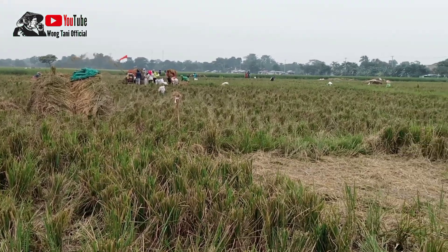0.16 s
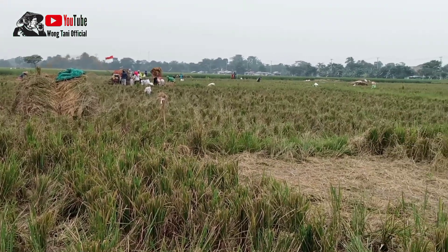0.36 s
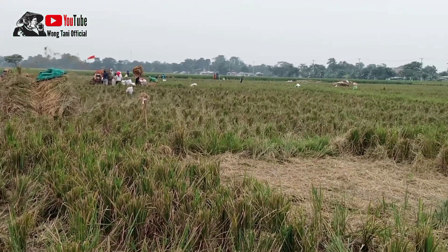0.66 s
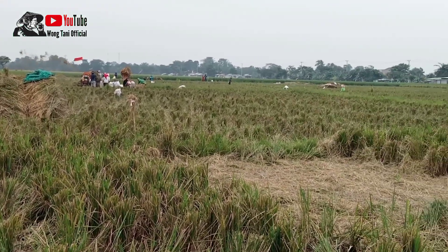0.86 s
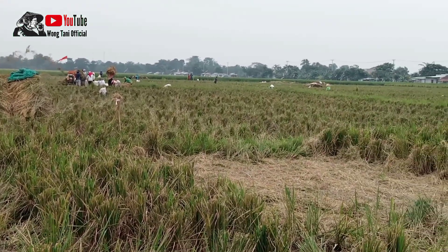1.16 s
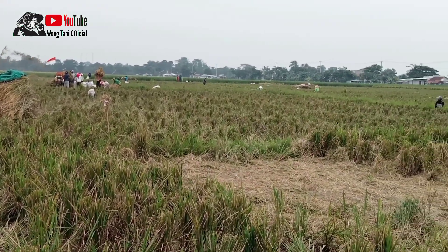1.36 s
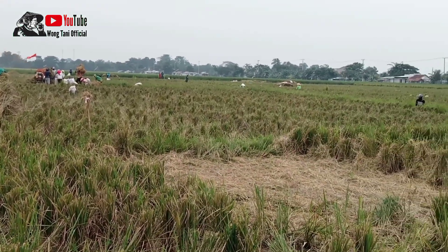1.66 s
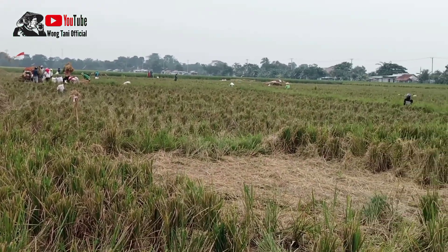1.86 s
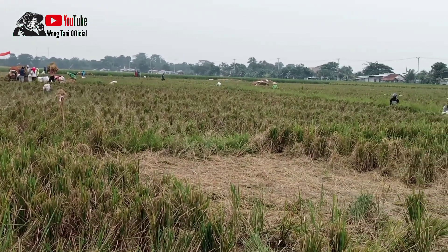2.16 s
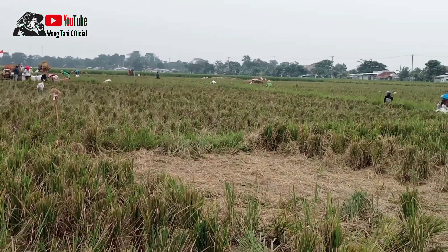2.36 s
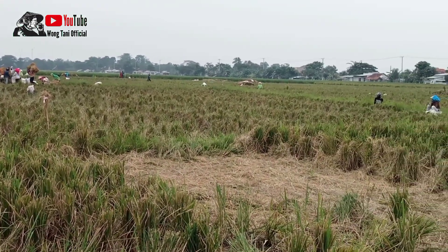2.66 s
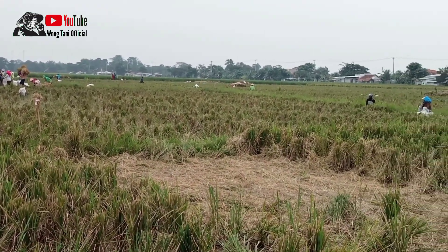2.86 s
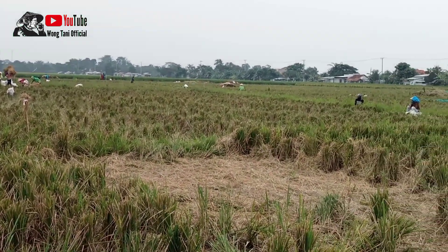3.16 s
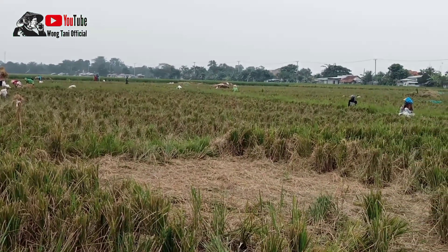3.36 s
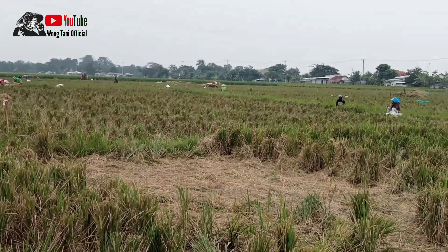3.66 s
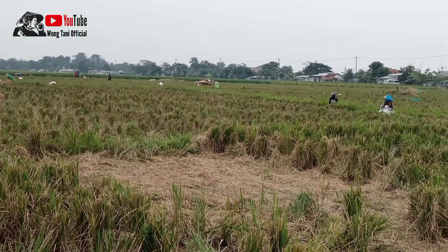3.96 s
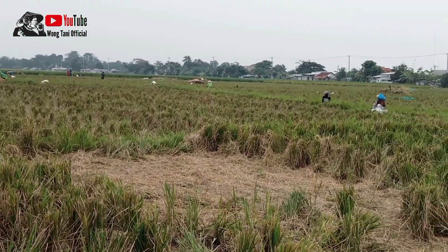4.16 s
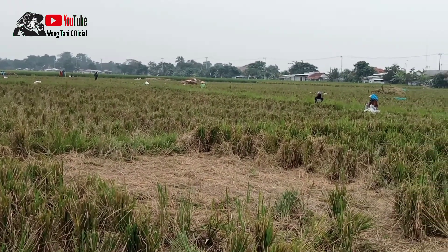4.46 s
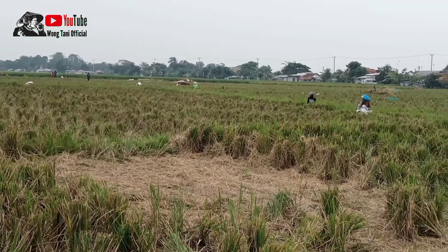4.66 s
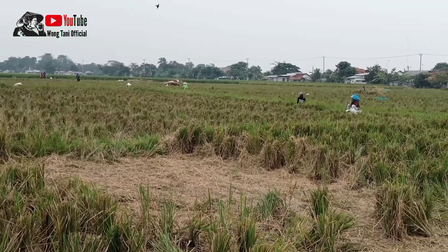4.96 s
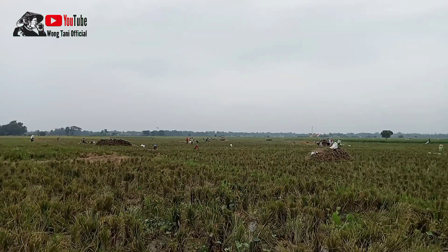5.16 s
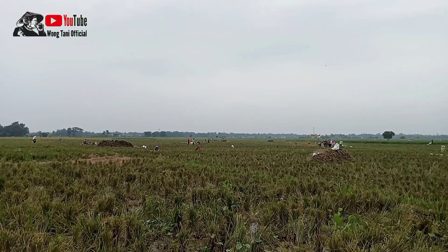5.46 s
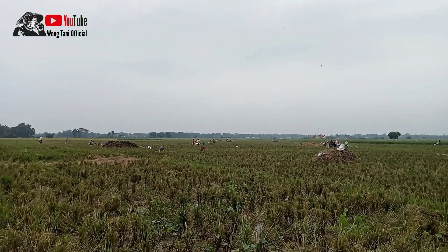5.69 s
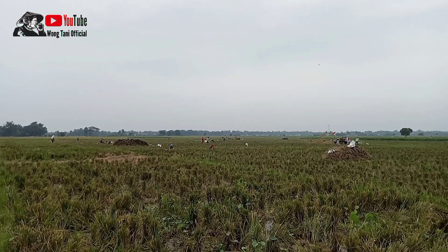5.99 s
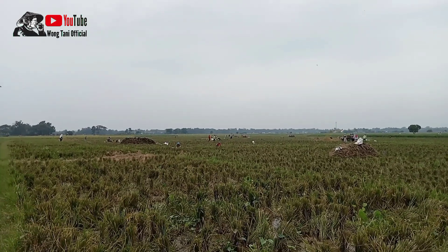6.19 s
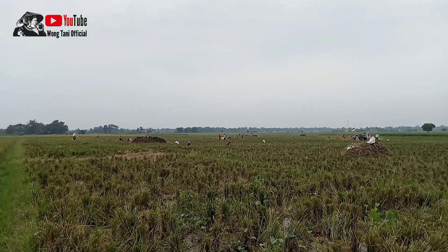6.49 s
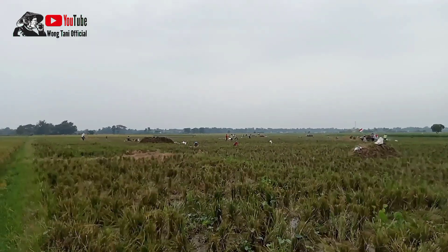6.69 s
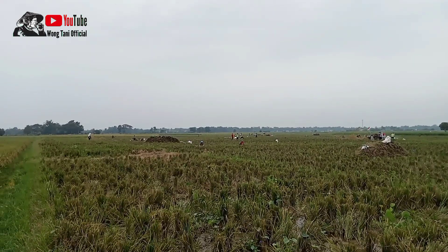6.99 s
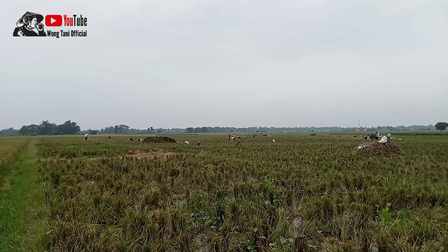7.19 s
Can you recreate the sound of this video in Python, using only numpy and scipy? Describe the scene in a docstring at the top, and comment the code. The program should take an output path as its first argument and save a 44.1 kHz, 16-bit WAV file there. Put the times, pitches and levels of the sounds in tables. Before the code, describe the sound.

A small engine chugs with a hissing bark, slows and barks harder, then after a brief break gives way to a distant drone.

```python
"""A one-cylinder engine drives a rice thresher in an open field: each firing is a thump and a hissing bark.
Other engines drone far away, over soft air and insects. The listener turns, which changes the bark's
tone, and there is a dry knock. Near 3 s the thresher is fed: the engine slows and barks harder.
At 5 s, after a brief silence, the field fades in from a spot farther off. There the bark is faint,
the drone remains, and a small knock and a rustle come near the end."""
import sys
import numpy as np
from scipy import signal
from scipy.fft import rfft, irfft, next_fast_len
from scipy.io import wavfile
from scipy.ndimage import uniform_filter1d, map_coordinates

SR = 44100
rng = np.random.default_rng(int(sys.argv[2]) if len(sys.argv) > 2 else 0)


def transcribe(signal):
    """Save signal, clipped to [-1, 1], as a 16-bit WAV file at the path in sys.argv[1]."""
    frames = np.atleast_2d(signal).T
    limited = np.clip(frames, -1, 1)
    pcm = np.round(limited * 32767).astype(np.int16)
    wavfile.write(sys.argv[1], SR, pcm)


N = 323253
TIME = np.arange(N) / SR
SIZE = next_fast_len(N + SR // 2, real=True)  # extra room for filters to ring out
HZ = np.fft.rfftfreq(SIZE, 1 / SR)
AT_FAR_SPOT = TIME > 5.03

# tone of the low thump of a firing: f/Hz, relative level/dB
THUMP_COLOUR = [(25, -45), (50, -16), (90, -5), (140, 2), (185, -3.5), (235, -7.5), (300, -7), (340, -12.5),
                (385, -25.5), (520, -29), (800, -59), (2000, -88)]


def amp(db):
    """Turn decibels into a gain to multiply by."""
    return 10 ** (np.asarray(db) / 20)


def unit(x):
    """Scale a signal to an average (RMS) strength of 1."""
    return x / np.sqrt(np.mean(x ** 2) + 1e-20)


def curve(points):
    """Join (time, value) points with straight lines, one value per sample."""
    return np.interp(TIME, *np.transpose(points))


def wobble(rate):
    """A smooth curve through `rate` random values a second."""
    knots = rng.standard_normal(int(N * rate / SR) + 4)
    fine = np.linspace(0, len(knots) - 1, 10 * len(knots))
    return np.interp(TIME * rate, fine, map_coordinates(knots, [fine]))


def colour(points):
    """A gain for each frequency, drawn through (f/Hz, level/dB) points."""
    hz, db = np.transpose(points)
    return amp(np.interp(np.log(HZ + 1), np.log(hz), db))


def resonances(modes):
    """A gain for each frequency, with a steep peak at each (f/Hz, width/Hz, level/dB)."""
    return np.sqrt(sum(amp(2 * db) / (1 + ((HZ - hz) / width) ** 2) ** 2 for hz, width, db in modes))


def filtered(x, gain):
    """Shape the tone of x so that it rings only after each hit (a minimum-phase filter)."""
    cepstrum = irfft(np.log(np.maximum(gain, 1e-6)), SIZE)
    cepstrum[1:SIZE // 2] *= 2
    cepstrum[SIZE // 2 + 1:] = 0
    return irfft(rfft(x, SIZE) * np.exp(rfft(cepstrum)), SIZE)[:N]


def noise(gain):
    """Steady noise of strength 1, its tone shaped by `gain`."""
    return unit(filtered(rng.standard_normal(N), gain))


def field():
    """Soft air over the rice, with a thin, high band of insects."""
    # tone of the air: f/Hz, relative level/dB
    air_colour = [(20, 0), (60, -5), (300, 3.5), (450, -3), (620, -8), (1000, -1), (1350, -10.5),
                  (1600, -2), (2100, 1.5), (3000, -8.5), (5400, -17.5), (7200, -21), (9000, -13.5),
                  (12000, -32), (15500, -46)]
    air = noise(colour(air_colour)) * amp(np.where(AT_FAR_SPOT, -60, -58) + wobble(2.51))
    insects = noise(resonances([(7170, 220, 0)])) * amp(-68.5 + 1.5 * wobble(6.2))
    return air + insects


def knocks():
    """Dry knocks and a soft rustle, each a band of noise that swells and dies."""
    # small sounds: t/s, level/dB, f/Hz, width/Hz, rise/s, time to fall 60 dB/s
    events = [(1.2355, -33, 2100, 210, 0.00035, 0.02), (1.222, -19, 3160, 390, 0.0015, 0.012),
              (6.598, -45.5, 1670, 370, 0.0045, 0.13), (6.598, -50, 2900, 740, 0.004, 0.14),
              (6.83, -52, 1630, 460, 0.098, 0.75)]
    out = np.zeros(N)
    for start, db, hz, width, rise, t60 in events:
        age = np.clip(TIME - start, 0, 2 * t60)
        envelope = (1 - np.exp(-age / rise)) * amp(db - 60 * age / t60)
        out += envelope * noise(resonances([(hz, width, 0)]))
    return out


def firings(rate, first_s, jitter_s, scatter_db):
    """One click each time an engine fires, slightly uneven in time and strength."""
    cycles = np.cumsum(rate) / SR
    cycles -= np.interp(first_s, TIME, cycles)
    on_beat = np.flatnonzero(np.diff(np.floor(cycles)))
    lateness, strength = rng.standard_normal((len(on_beat), 2)).T
    starts = np.clip(on_beat + jitter_s * SR * lateness, 0, N - 1).astype(int)
    return np.bincount(starts, amp(scatter_db * strength), N)


def distant_engines():
    """Only the low tones of other engines carry over the field; moving air makes them swell and fade."""
    # one engine a row: firing rate/Hz, relative level at the near spot/dB, at the far spot/dB
    engines = [(31.26, -5, -0.5), (27.22, -3.5, -8), (24.44, -0.5, -20.5), (33.6, -10, -7)]
    # tone of their drone: f/Hz, relative level/dB
    drone_colour = [(20, -47), (45, -20.5), (62, -14), (100, -9), (125, 1), (155, 2), (185, -0.5),
                    (210, -10), (250, -12), (300, -12.5), (345, -14), (400, -28), (600, -42), (1200, -53.5)]
    drone = np.zeros(N)
    for rate, near_db, far_db in engines:
        speed = rate * (1 + 0.00598 * wobble(2))
        pulses = firings(speed, first_s=rng.random(), jitter_s=0.0002, scatter_db=3.0)
        paths = rfft(rng.standard_normal(SR // 30), SIZE)  # many paths smear each firing
        tone = irfft(rfft(pulses, SIZE) * paths / np.abs(paths) * colour(drone_colour), SIZE)[:N]
        drone += amp(np.where(AT_FAR_SPOT, far_db, near_db) + 2 * wobble(6.5)) * unit(tone)
    rumble = noise(colour(drone_colour))
    level_db = np.where(AT_FAR_SPOT, -43, -46.5) + 1.34 * wobble(2.85)
    return amp(level_db) * unit(unit(drone) + amp(-7) * rumble)


def drifting(x, depth_db, flicker_db=1.82):
    """Moving air slowly shifts the tone of a sound, and each burst differs a little from the last."""
    spectra = signal.stft(x, nperseg=512)[2]

    def ripple(bands, frames):
        """Random values smoothed across frequency, then time."""
        rough = uniform_filter1d(rng.standard_normal(spectra.shape), size=bands, axis=0)
        return unit(uniform_filter1d(rough, size=frames, axis=1))

    change_db = depth_db * ripple(bands=3, frames=50) + flicker_db * ripple(bands=24, frames=12)
    return signal.istft(spectra * amp(change_db), nperseg=512)[1][:N]


def puffs(pulses, rise_s, fall_s, tail_db, tail_s, rough_db):
    """Each firing lets out a ragged burst of swirling gas; the field scatters a weak tail behind it."""
    t = TIME[:SR // 8]
    attack = 1 - np.exp(-(t / rise_s) ** 3)
    decay = amp(-60 * t / fall_s) + amp(tail_db - 60 * t / tail_s)
    flow = signal.fftconvolve(pulses, attack * decay)[:N]
    flow = np.roll(flow, -SR // 650)  # gas leaks just before the thump
    eddies = amp(rough_db * np.tanh(2 * wobble(1100)))
    return flow * eddies * rng.standard_normal(N)


def balanced(x, bark_db, rasp_db, hiss_db):
    """Split an exhaust sound into low rasp, middle bark and high hiss, each at its own level."""
    low = 1 / (1 + (HZ / 2500) ** 16)
    high = 1 - 1 / (1 + (HZ / 7800) ** 24)
    rasp, bark, hiss = irfft(rfft(x, SIZE) * [low, 1 - low - high, high], SIZE)[:, :N]
    return amp(bark_db) * unit(bark) + amp(rasp_db) * unit(rasp) + amp(hiss_db) * unit(hiss)


def far_engine():
    """From far off the bark is dull and smeared and the thump weak; it rings when the bark swells."""
    # engine speed: t/s, firing rate/Hz
    speed = [(5.06, 27.83), (5.4, 30.58), (5.8, 30.06), (6.2, 31.26), (6.6, 30.47), (7, 30.89),
             (7.33, 30.62)]
    # strength of the bark: t/s, level/dB
    bark_level = [(5.08, -64), (5.2, -49.5), (5.3, -51), (5.5, -60.5), (5.75, -62), (5.93, -53.5),
                  (6.3, -62.5), (6.95, -61), (7.33, -67)]
    # tone of the exhaust from afar: f/Hz, relative level/dB
    far_colour = [(350, -24), (600, -11), (950, -7), (1300, -14), (1550, 1), (2100, 8), (3030, -5),
                  (3770, -3), (4300, -6.5), (5440, -10.5), (7240, -5.5), (9000, -7), (12500, -31),
                  (15500, -20)]
    # muffler tones that carry this far: f/Hz, width/Hz, relative level/dB
    muffler = [(1590, 70, 0), (2120, 92, 8), (2350, 67, -0.5)]
    bark_db = curve(bark_level)
    swell_db = bark_db + 61.2  # how far the bark is above its usual level
    pulses = firings(curve(speed), first_s=5.074, jitter_s=0.00025, scatter_db=1.1)
    early = np.roll(pulses, -SR // 450)
    gas = puffs(early, rise_s=0.0064, fall_s=0.026, tail_db=-30, tail_s=0.084, rough_db=3.5)
    dull = filtered(gas, colour(far_colour) + resonances(muffler))
    dull = unit(drifting(dull, depth_db=2.9, flicker_db=1.3))
    bark = balanced(dull, bark_db, rasp_db=-60.7 + 0.42 * swell_db, hiss_db=-69.7 + 0.96 * swell_db)
    ring = amp(-74 + 2.15 * swell_db) * unit(filtered(gas, resonances([(3780, 180, 0)])))
    thump = amp(-52) * unit(filtered(pulses, colour(THUMP_COLOUR)))
    return bark + ring + thump


def near_bark(pulses, load):
    """Bursts of gas ring the muffler; the load and the listener's turn shift the tones that are heard."""
    # muffler tones running light, light after the turn, and under load: f/Hz, width/Hz, relative level/dB
    light_tones = [(890, 250, -25), (1225, 65.7, -10), (1820, 190, -5.5), (2585, 133, -6), (2990, 140, -5),
                   (3690, 210, 0.5), (4490, 220, -8.5), (4980, 120, -8), (5940, 260, -5.5), (6660, 81, -15),
                   (7260, 130, -15), (8560, 160, -8), (9200, 310, -25), (10000, 850, -17.5),
                   (11900, 550, -33), (14300, 990, -29)]
    turned_tones = [(893, 280, -22), (1183, 93, -11.5), (1860, 170, -6), (2737, 160, -6), (3220, 180, -5.5),
                    (3560, 77, -2), (3860, 230, 4.5), (4470, 74, -2.5), (5330, 89, -10), (6010, 114, -6.5),
                    (6790, 210, -9.5), (8200, 110, -17), (8980, 220, -4.5), (10230, 290, -14.5),
                    (10800, 360, -18), (12700, 420, -19), (13900, 750, -20.5)]
    loaded_tones = [(895, 134, -29), (1267, 67, -13), (1974, 217, -7.5), (2770, 24, -7), (3140, 144, 0.5),
                    (3777, 91, 0.5), (3926, 82, 3), (4600, 110, -13.5), (5340, 74, -8), (6090, 110, -7),
                    (6823, 125, -1.5), (7110, 90, -9.5), (7600, 110, -21), (8250, 74, -13), (8910, 360, -6),
                    (10120, 500, -2.5), (11050, 240, -11.5), (11500, 350, -10.5), (13050, 200, -5),
                    (13600, 270, -28), (14400, 1000, -15)]
    # broad hiss of the gas jet: f/Hz, relative level/dB
    jet_colour = [(400, -65), (700, -16.5), (1100, 7), (1450, -37), (2300, -22), (4000, -2.5), (7500, 5),
                  (10500, 8), (15000, 6), (16000, -39)]
    # the listener's turn: t/s, share done/0-1
    turn_progress = [(1.05, 0.03), (1.75, 0.97)]
    # strength of the bark and of its high hiss: t/s, level/dB
    bark_level = [(0, -44), (0.3, -42), (1.45, -38.5), (1.85, -39.5), (2.2, -46.5), (2.45, -37.5),
                  (2.83, -40), (2.97, -32.5), (3.55, -29.5), (4.15, -29.5), (4.35, -34), (4.75, -31),
                  (5.0, -36)]
    hiss_level = [(0, -53), (0.25, -58.5), (0.75, -51.5), (1.8, -49), (2.22, -57.0), (2.7, -42.5),
                  (3.5, -34.5), (4.1, -38), (4.5, -44), (4.75, -40), (5.0, -52.0)]

    def exhaust(gas, tones, jet_db):
        """The gas leaves through the muffler as ringing tones plus a broad hiss."""
        sound = filtered(gas, resonances(tones) + amp(jet_db) * colour(jet_colour))
        sound = drifting(sound, depth_db=3.0)
        return balanced(sound, curve(bark_level), rasp_db=-52 + 10.5 * load, hiss_db=curve(hiss_level))

    turn = curve(turn_progress)
    bark = np.zeros(N)
    for tones, share in (light_tones, 1 - turn), (turned_tones, turn):
        gas = puffs(pulses, rise_s=0.0028, fall_s=0.027, tail_db=-28.5, tail_s=0.16, rough_db=2)
        bark += np.sqrt((1 - load) * share) * exhaust(gas, tones, jet_db=-30.5)
    sharp_gas = puffs(pulses, rise_s=0.0025, fall_s=0.024, tail_db=-31.5, tail_s=0.17, rough_db=0.5)
    return bark + np.sqrt(load) * exhaust(sharp_gas, loaded_tones, jet_db=-25)


def near_thump(pulses, load):
    """Each firing thumps through the muffler; under load it is louder and the exhaust pipe booms."""
    # booming tones of the pipe: f/Hz, width/Hz, relative level/dB
    pipe_tones = [(85, 6.6, -4), (148, 8.2, -8), (299, 8, 3.5), (470, 59, -3)]
    soft = unit(filtered(pulses, colour(THUMP_COLOUR)))
    hard = unit(filtered(pulses, colour(THUMP_COLOUR) * (1 + resonances(pipe_tones))))
    return amp(-46 + 3.5 * load) * ((1 - load) * soft + load * hard)


def near_engine():
    """Close by, the engine barks and thumps with each firing and slows as the thresher is fed."""
    # engine speed: t/s, firing rate/Hz
    speed = [(0, 30.61), (0.5, 30.85), (1, 30.64), (1.5, 31.12), (2, 31.4), (2.4, 30.86), (2.8, 30.41),
             (3.0, 29.43), (3.2, 27.9), (3.6, 28.94), (4, 28.81), (4.3, 29.09), (4.6, 29.99), (4.8, 31.1),
             (5.02, 30.4)]
    # how hard the thresher makes the engine work: t/s, load/0-1
    workload = [(2.2, 0.01), (2.7, 0.22), (3.05, 0.91), (4.2, 0.98), (4.75, 0.9), (5, 0.49)]
    load = curve(workload)
    pulses = firings(curve(speed), first_s=0.008, jitter_s=0.000049, scatter_db=1.26)
    return near_bark(pulses, load) - near_thump(pulses, load)


def scene():
    """The thresher's engine, first near and then far, over the background; one channel."""
    engine = np.where(AT_FAR_SPOT, far_engine(), near_engine())
    return (engine + distant_engines() + field() + knocks())[None]


def record(dry):
    """The sound stops between the two spots and fades back in; the very highest treble is cut."""
    stop_s, fade_out_s = 5.009, 0.007
    resume_s, fade_in_s, start_gain = 5.058, 0.34, 0.043
    before = np.clip((stop_s - TIME) / fade_out_s, 0, 1)
    after = (TIME > resume_s) * np.clip(start_gain + (TIME - resume_s) / fade_in_s, 0, 1)
    treble_cut = 1 / (1 + (HZ / 15600) ** 100)
    return irfft(rfft(dry * (before + after), SIZE) * treble_cut, SIZE)[:, :N]


dry = scene()
out = record(dry)
transcribe(out)
```